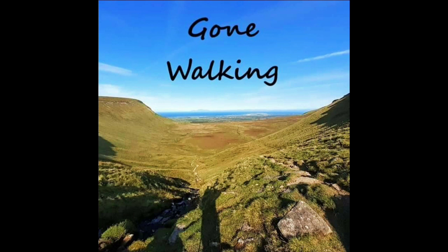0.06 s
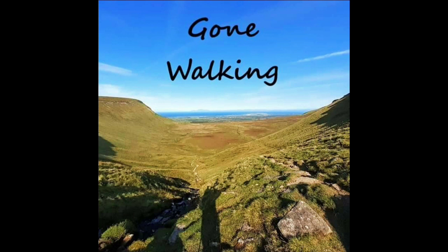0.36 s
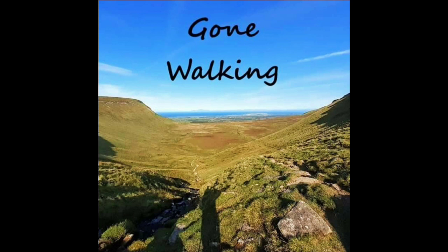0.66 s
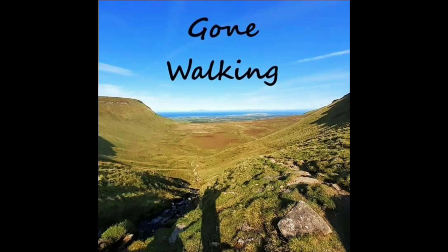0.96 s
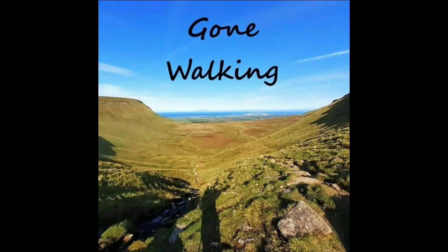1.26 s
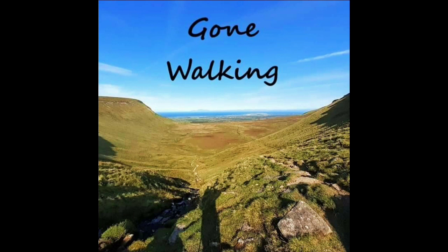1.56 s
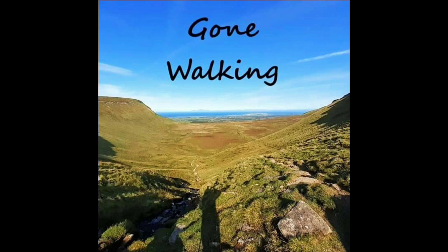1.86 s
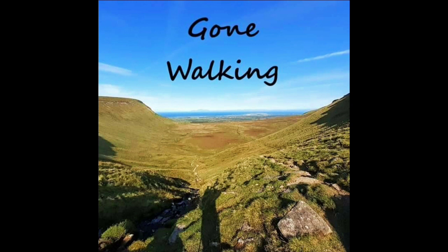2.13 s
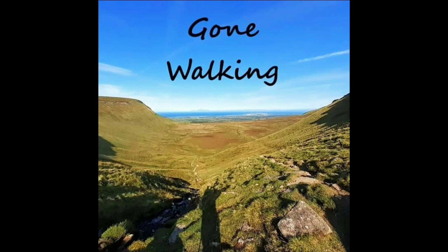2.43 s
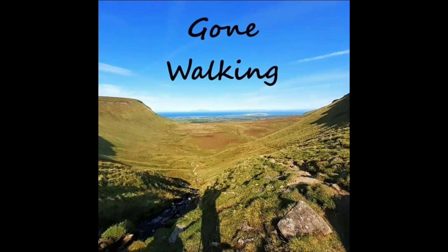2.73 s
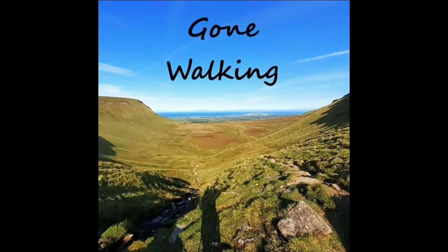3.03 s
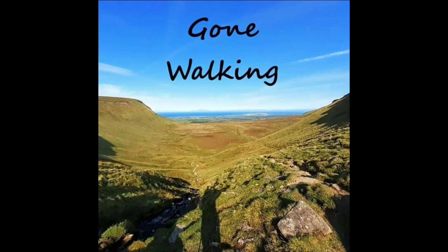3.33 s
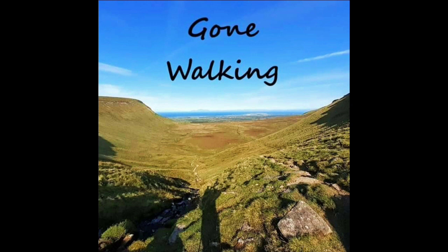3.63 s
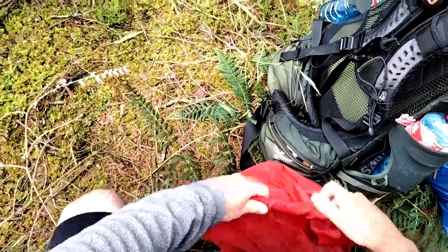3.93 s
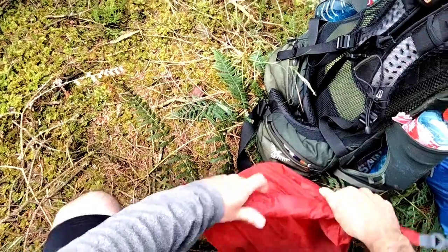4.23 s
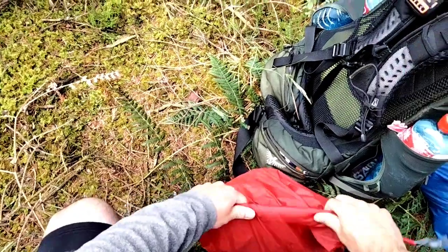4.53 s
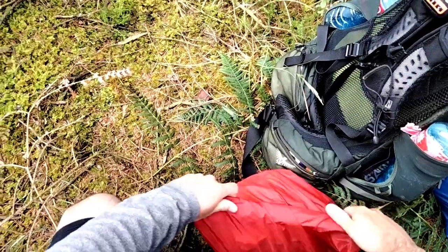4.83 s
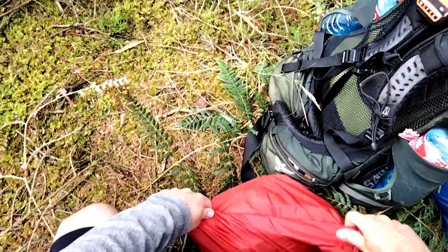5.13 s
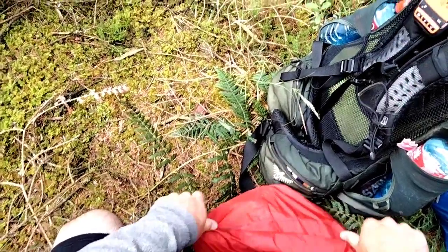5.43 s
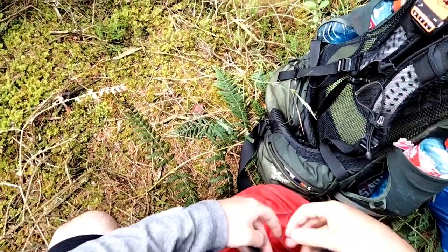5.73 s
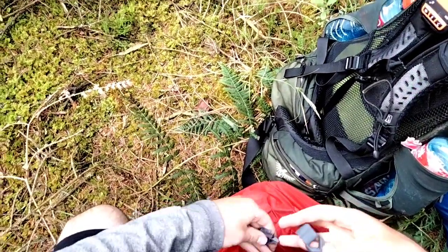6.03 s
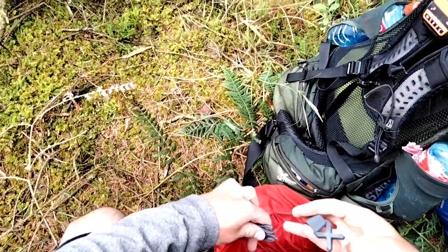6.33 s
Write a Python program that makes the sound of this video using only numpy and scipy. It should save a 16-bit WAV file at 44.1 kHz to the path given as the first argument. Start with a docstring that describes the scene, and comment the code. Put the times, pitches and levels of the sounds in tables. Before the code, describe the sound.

Hands squeeze and roll a thin nylon stuff sack close to a body-worn microphone, outdoors with no echo. The rustling starts at about 0.2 seconds: a bright sliding hiss mixed with crackling, in quick uneven strokes. It is strongest around 0.8 to 1.3 seconds, with sharp crease snaps and the dull shifting of the soft contents. A flap and more snaps come near 1.8 seconds, and the crumpling sounds slightly hollow from trapped air. From about 3 seconds the strokes are lighter, mostly short swishes with scattered clicks and soft flaps, and a faint zipping rub over the weave near 3.4 seconds. A sharp snap comes at 5.5 seconds and a pat of cloth at 5.8. The rustle then drops away, leaving a few faint buckle ticks until about 6.4 seconds. A faint low wind rumble lies underneath throughout.

```python
"""Rolling up a nylon sack

Two hands squeeze and roll a thin nylon stuff sack on the ground, then take up its buckle.
With each stroke the cloth hisses as it slides and crackles as it crumples. Creases snap,
panels flap, the ribbed weave zips and the soft load shifts. It is open air, with no echo.
A little wind touches a body-worn microphone, whose small opening rings in the high treble."""
import sys
import numpy as np
from scipy import signal
from scipy.fft import rfft, irfft, next_fast_len
from scipy.io import wavfile
from scipy.ndimage import uniform_filter1d

SR = 44100
rng = np.random.default_rng(int(sys.argv[2]) if len(sys.argv) > 2 else 0)


def master_out(mix):
    """Clip the mix to full scale and print it as 16-bit PCM to the path in sys.argv[1]."""
    frames = np.transpose(np.atleast_2d(mix))
    ceiling = np.clip(frames, -1, 1)
    pcm = np.round(ceiling * 32767).astype(np.int16)
    wavfile.write(sys.argv[1], SR, pcm)


N = 286021
T = np.arange(N) / SR

# strokes of the hands (start [s], length [s], sliding [dB], crumpling [dB], brightness [dB])
STROKES = [(0.219, 0.22, -67, -53.0, -3), (0.278, 0.081, -50.5, -50, -7), (0.407, 0.18, -48, -51, -8),
           (0.567, 0.13, -49, -54, -7), (0.696, 0.375, -51.5, -50.5, -12), (0.817, 0.22, -41.5, -46, -5),
           (1.072, 0.14, -48.5, -54, -8), (1.229, 0.094, -44.5, -50.5, -2), (1.362, 0.21, -52, -59.5, -7),
           (1.525, 0.075, -50.5, -53.5, -3), (1.621, 0.16, -49, -53.5, -3), (1.83, 0.052, -49, -53.5, -1),
           (1.921, 0.092, -59.5, -60, -5), (2.036, 0.091, -48, -53, -8.5), (2.107, 0.1, -51.5, -63.5, 0.5),
           (2.308, 0.063, -46.5, -54, 3), (2.423, 0.1, -46, -62, -7), (2.64, 0.104, -54, -62.5, -4),
           (2.749, 0.066, -44.5, -64.5, -2), (2.814, 0.086, -50, -53.5, -11),
           (2.92, 0.099, -44.5, -57.5, -9), (3.045, 0.144, -49.5, -68, -6), (3.14, 0.13, -49, -76, 0),
           (3.258, 0.12, -53.5, -60.5, -3), (3.403, 0.096, -46, -51.5, -2), (3.507, 0.066, -52.5, -66, -2),
           (3.649, 0.053, -48.5, -58, -5), (3.737, 0.044, -45.5, -49, -4), (3.836, 0.027, -46, -53, -5),
           (3.99, 0.14, -60.5, -69, -7), (4.07, 0.084, -50, -59, -3.5), (4.16, 0.072, -49, -55.5, -8),
           (4.259, 0.07, -52.5, -57, -11), (4.502, 0.075, -52.5, -59.5, -1), (4.642, 0.092, -54.5, -56, -5),
           (4.712, 0.1, -50.5, -64, -2), (4.83, 0.061, -48, -60.5, -1), (4.976, 0.12, -56, -71, -5),
           (5.085, 0.134, -49, -71, -1), (5.242, 0.23, -54.5, -62, -5), (5.519, 0.11, -53.5, -77, -8),
           (5.6, 0.073, -48, -54, -3.5), (5.698, 0.14, -53.5, -58.5, 0), (6.252, 0.064, -72.5, -76, 5)]
# the grip stirs the cloth between strokes, until the hands move to the buckle (time [s], sliding [dB])
GRIP = [(0.125, -106), (0.23, -61), (1, -65), (2.2, -64), (3.6, -65.5), (5.85, -63), (5.93, -73.5),
        (6.2, -94), (6.49, -111)]
# the hands take a new hold, nearly always with a brief hush (time [s], level change [dB])
NEW_HOLDS = [(1.203, -6), (1.36, -7), (1.635, -10), (2.645, -4.5), (2.838, -6), (3.376, -3), (3.64, 1.5),
             (4.96, -4), (5.445, -10), (5.925, -18)]
# tone of the sliding hiss (frequency [Hz], level [dB])
SLIDE_COLOUR = [(500, -36), (2500, -10), (5000, -9), (6400, -3.5), (8500, -1), (10000, 1), (15500, 4)]
# tone of the crumpling (frequency [Hz], level [dB])
CRUMPLE_COLOUR = [(100, -13), (300, -6.5), (700, -0.5), (1150, -7), (1400, -6.5), (1800, -2), (2700, -3.5),
                  (3700, -2.5), (5200, -7), (8000, -13), (15500, -20.5)]
# air left in the sack, which makes the crumpling sound hollow (time [s], share [0-1])
TRAPPED_AIR = [(0, 0.3), (1.2, 0.64), (2, 1), (2.8, 0.5), (3.3, 0), (6.4, 0)]
# crease snaps and buckle ticks (time [s], sharp edge [dB], panel [dB], panel pitch [Hz], length [ms])
SNAPS = [(0.199, -31.5, -47, 2000, 0.96), (0.223, -23, -35.5, 1700, 0.94), (0.249, -23, -43, 4600, 0.2),
         (0.3075, -21, -32, 2400, 1.0), (0.346, -18.5, -46, 5100, 0.34), (0.3524, -18, -34, 4500, 0.44),
         (0.527, -29, -32, 1800, 0.7), (0.647, -16.5, -32, 3980, 0.2), (0.6927, -17.5, -35, 1800, 0.3),
         (0.752, -36, -31, 1900, 0.9), (0.872, -24, -24, 3400, 0.38), (0.9614, -7, -32, 3500, 0.1),
         (0.977, -19, -27, 2200, 0.3), (1.017, -16, -39, 1800, 1), (1.035, -13, -25, 4900, 0.41),
         (1.093, -24, -33, 3600, 0.2), (1.137, -22, -39, 4030, 0.36), (1.189, -23, -35, 3500, 0.57),
         (1.483, -25, -29, 3130, 0.58), (1.798, -16, -25.5, 4200, 2.3), (1.802, -14, -37, 4600, 4.5),
         (1.8837, -28, -31, 5400, 1.7), (1.8884, -10.5, -31, 3600, 0.36), (1.8994, -32, -29, 1820, 0.37),
         (1.944, -24, -29, 2820, 0.7), (2.1023, -18, -37, 5100, 0.23), (2.271, -43, -35, 3460, 0.45),
         (2.3454, -19.5, -36, 3400, 2.1), (2.3923, -16.5, -37, 5200, 0.36), (2.4748, -21, -30, 4000, 1.9),
         (2.665, -38, -56, 2000, 0.7), (2.8848, -20, -45, 2200, 0.14), (2.9046, -24, -42, 5200, 0.5),
         (2.9186, -22, -35, 5000, 0.9), (3.098, -26, -34, 3320, 0.76), (3.318, -35, -31, 3550, 0.27),
         (3.332, -24, -30.5, 3730, 2.6), (3.465, -19, -42.5, 4800, 2.7), (3.536, -16, -43, 2300, 4.7),
         (3.562, -21, -30.5, 3150, 0.15), (3.689, -20.5, -37, 3180, 0.34), (4.132, -33, -36, 2320, 1.3),
         (4.5334, -31, -35.5, 3520, 0.7), (5.2307, -27, -35, 3600, 1.6), (5.3319, -29, -36, 2010, 0.3),
         (5.4699, -10.5, -35, 3560, 0.14), (5.7861, -36, -50, 1650, 0.9), (5.9056, -46.5, -46, 4000, 1.8),
         (5.9515, -33.5, -64, 2500, 5.9), (6.0455, -34.5, -46.5, 4100, 0.45), (6.3757, -47, -62, 2700, 0.4)]
# tone of a snap's sharp edge (frequency [Hz], level [dB])
EDGE_COLOUR = [(700, -61), (2500, -33), (5200, -9.5), (6800, -5), (9000, -1), (15500, -14.5)]
# slack panels pulled tight or patted, the lowest puffing out air (time [s], level [dB], pitch [Hz])
FLAPS = [(1.062, -26.5, 494), (1.19, -34.5, 720), (1.605, -32, 91), (1.793, -39, 74.4), (1.797, -24.5, 348),
         (2.065, -25, 546), (3.317, -35, 710), (3.507, -33.5, 416), (4.668, -26, 27.2), (4.781, -34, 520),
         (5.057, -38.5, 302), (5.228, -31, 735), (5.342, -36.5, 570), (5.644, -34.5, 740),
         (5.785, -33.5, 79), (5.7855, -21, 306)]
# shoves that move the soft load inside the sack (start [s], length [s], level [dB])
SHOVES = [(0.208, 0.23, -44.5), (0.5, 0.058, -44), (0.759, 0.26, -39.5), (1.184, 0.063, -44.5),
          (1.523, 0.22, -55), (1.87, 0.06, -44), (2.026, 0.049, -42.5), (2.304, 0.22, -51),
          (2.802, 0.079, -49.5), (3.028, 0.042, -47), (3.95, 0.063, -51), (4.31, 0.51, -54),
          (5.172, 0.036, -48), (5.63, 0.045, -53)]
# dull tone of the load (frequency [Hz], level [dB])
LOAD_COLOUR = [(40, -12), (120, -9), (220, -4), (340, .5), (580, -1.5), (780, -5), (1050, -11),
               (1600, -15.5), (5000, -15)]
# a finger or strap runs over the weave, one list a stroke (time [s], rib rate [Hz], level [dB])
ZIPS = [
    [(3.335, 1700, -84), (3.354, 942, -68), (3.367, 630, -56), (3.381, 507, -60.5), (3.402, 291, -74),
     (3.42, 392, -70), (3.445, 820, -75)],
    [(5.79, 2440, -63), (5.808, 2950, -66), (5.83, 2950, -69), (5.87, 3030, -78)],
    [(5.925, 8100, -99), (5.975, 6200, -77), (6.01, 6200, -86), (6.07, 6750, -81), (6.14, 6800, -98),
     (6.17, 6900, -97)],
]
# wind and handling rumble on the microphone (time [s], level [dB])
WIND_LEVEL = [(0.13, -94), (0.22, -73), (0.92, -65.5), (1.15, -67), (1.62, -67), (2.05, -68), (2.45, -66),
              (3.2, -69), (3.7, -71), (4.1, -68.5), (4.35, -65), (4.75, -64), (5.3, -73), (5.85, -62),
              (6.05, -73.5), (6.48, -78)]
# deep tone of that rumble (frequency [Hz], level [dB])
WIND_COLOUR = [(10, 10.5), (28, 1), (60, -2.5), (110, -7.5), (250, -6.5), (1500, -25)]
# where the microphone's opening, its port, rings (frequency [Hz], width [Hz], level [dB])
PORT_RINGS = [(8745, 810, 12), (15100, 2700, -8)]

TOP_HZ = 15650  # upper edge of the treble


def hands(sag_db=4.0, grip_crumple_db=4.5, new_hold_s=0.014):
    """Strokes add to the grip and slide less as the cloth tightens; gives three curves in dB."""
    sliding = treble = undb(curves(GRIP)[0]) ** 2
    crumpling = sliding * undb(grip_crumple_db) ** 2
    for start_s, length_s, slide_db, crumple_db, bright_db in STROKES:
        power = push(start_s, length_s)
        progress = np.clip((T - start_s) / length_s, 0, 1)
        stroke = power * undb(slide_db - sag_db * (progress - .5)) ** 2
        sliding = sliding + stroke
        treble = treble + stroke * undb(bright_db) ** 2
        crumpling = crumpling + power * undb(crumple_db) ** 2
    hold_db = sum(db * np.exp(-((T - s) / new_hold_s) ** 2) for s, db in NEW_HOLDS)
    hold = undb(hold_db) ** 2
    return 10 * np.log10([sliding * hold, crumpling * hold, treble / sliding])


def push(start_s, length_s, rise_s=0.054, fade_s=0.037):
    """The power of one push: the hand gathers speed, holds, then lets the cloth settle."""
    rise = np.clip((T - start_s) / rise_s, 0, 1)
    fade = np.exp(-np.clip(T - start_s - length_s, 0, 1) / fade_s)
    return (rise * fade) ** 2


def slide(level_db, bright_db, weave_hz=9500, weave_db=-19):
    """Threads flick over threads, so densely that they hiss; brightness sets the very top."""
    flicks = grains(rate=18000, spread_db=0.5) * catches(slow_db=1.72, fast_db=0.36)
    # the regular weave adds a faint, ragged note that wanders, as the cloth's speed is uneven
    wander = np.exp(0.23 * drift(4.8) + 0.047 * drift(1500))
    hz = np.minimum(weave_hz * wander, TOP_HZ)
    note = unit(np.sin(2 * np.pi * np.cumsum(hz) / SR))
    hiss = colour(flicks, SLIDE_COLOUR) + undb(weave_db) * note
    top = colour(hiss, [(9500, -37), (10300, -14), (11500, -1.5)])
    return (hiss - top + top * undb(bright_db)) * undb(level_db)


def crumple(level_db, lone_db=-7, hollow_db=-5):
    """Small wrinkles give way in bunches, more often under a hard squeeze; larger ones tick alone."""
    rate = 3000 * undb(0.32 * (level_db - np.median(level_db)))
    lone_ticks = undb(lone_db) * grains(rate=55, spread_db=2.5)
    bunches = grains(rate, spread_db=-0.5) * catches(slow_db=1.64, fast_db=1.0)
    crackle = colour(unit(bunches + lone_ticks), CRUMPLE_COLOUR) * undb(level_db)
    hollow = undb(hollow_db) * ring(crackle, hz=1900, width_hz=800)
    return crackle + curves(TRAPPED_AIR)[0] * hollow


def snaps(panel_width_hz=3000, tone_db=-1, click_ms=0.21, scatter_db=-16, scatter_ms=5.4):
    """A crease flips with one click, or a run of small slips if longer. Nearby folds scatter it."""
    out, ms = np.zeros(N), 1000 * T[:1024]
    lead = 32  # samples of room before the click
    for s, edge_db, panel_db, hz, length_ms in SNAPS:
        slips = unit_energy(rng.standard_normal(len(ms)) * np.exp(-ms / length_ms))
        scatter = unit_energy(rng.standard_normal(len(ms)) * np.exp(-ms / scatter_ms))
        click_share = np.exp(-length_ms / click_ms)
        flip = np.sqrt(click_share) * (ms == 0) + np.sqrt(1 - click_share) * slips
        burst = np.pad(flip + undb(scatter_db) * scatter, (lead, 0))
        edge = colour(burst, EDGE_COLOUR)
        # the panel beside the crease gives a broad crack and a short tone of its own
        crack = ring(ring(burst, hz, panel_width_hz), hz, panel_width_hz)
        panel = crack + undb(tone_db) * ring(burst, hz, width_hz=500)
        for part, db in ((edge, edge_db), (panel, panel_db)):
            # each level allows for what the port will add
            add(out, s - lead / SR, undb(db) * part / np.linalg.norm(port(part)))
    return out


def small_snaps(crumple_db, usual_db=-71, follow=1.25):
    """Lesser creases flip at random: loud under a hard squeeze, very faint in a light hold."""
    clicks = unit(colour(grains(rate=70, spread_db=2.0), EDGE_COLOUR))
    return clicks * undb(usual_db + follow * (crumple_db - np.median(crumple_db)))


def folds(x, swell_db=2.0, count=40):
    """The folds keep changing shape, so each narrow range of pitch swells and sinks on its own."""
    out, size = np.zeros(N), next_fast_len(N)
    spectrum = rfft(x, size)
    band_number = np.sqrt(np.linspace(0, 1, len(spectrum))) * (count - 1)
    for k in range(count):
        weight = np.maximum(1 - abs(band_number - k), 0)
        band = irfft(spectrum * weight, size)[:N]
        out += band * undb(swell_db * drift(30))
    return out


def flaps(swing_cycles=0.82, flutter_cycles=3.8, flutter_db=-13, crack_db=-7, crack_s=0.0016):
    """A panel jerks tight: one quick swing of air, then a flutter; small panels add a papery crack."""
    out, t = np.zeros(N), T[:8192]
    for s, db, hz in FLAPS:
        noise = rng.standard_normal(len(t))
        swing = np.sin(2 * np.pi * hz * t) * np.exp(-t * hz / swing_cycles)
        flutter = unit(ring(ring(noise, hz, hz), hz, hz)) * np.exp(-t * hz / flutter_cycles)
        smallness = min(hz / 250, 1) ** 2
        crack = smallness * unit(ring(noise, hz=1700, width_hz=590)) * np.exp(-t / crack_s)
        flap = swing + undb(flutter_db) * flutter + undb(crack_db) * crack
        add(out, s, undb(db) * unit_energy(flap))
    return out


def soft_load(crumple_db, usual_db=-57, follow=0.28):
    """Broad folds patter dully over the filling: a little with every squeeze, more with a shove."""
    stirred = undb(usual_db + follow * (crumple_db - np.median(crumple_db))) ** 2
    shoved = sum(push(start_s, length_s) * undb(db) ** 2 for start_s, length_s, db in SHOVES)
    patter = grains(rate=1800, spread_db=1.5) * catches(slow_db=2.07, fast_db=3.5)
    return colour(patter, LOAD_COLOUR) * np.sqrt(stirred + shoved)


def zips(jitter=0.041, flutter_db=-1.0, second_db=-15, third_db=-19):
    """Evenly spaced ribs sing at a pitch that follows the speed of the stroke."""
    out = np.zeros(N)
    for stroke in ZIPS:
        hz, db = curves(stroke)
        phase = 2 * np.pi * np.cumsum(hz * (1 + jitter * drift(900))) / SR
        touching = (T > stroke[0][0]) & (T < stroke[-1][0])
        contact = uniform_filter1d(touching.astype(float), size=300)  # soften both ends
        tone = np.sin(phase) + undb(second_db) * np.sin(2 * phase) + undb(third_db) * np.sin(3 * phase)
        out += unit(tone * undb(flutter_db * drift(300))) * undb(db) * contact
    return out


def wind():
    """Light air and the moving body rumble on the microphone."""
    rumble = unit(colour(rng.standard_normal(N), WIND_COLOUR))
    return rumble * undb(curves(WIND_LEVEL)[0])


def port(x):
    """The small opening in front of the microphone rings with every click."""
    return x + sum(undb(db) * ring(x, hz, width_hz) for hz, width_hz, db in PORT_RINGS)


def grains(rate, spread_db):
    """Tiny clicks of uneven strength at random moments, about rate of them a second."""
    strength = undb(spread_db * np.clip(rng.standard_normal(N), -2, 2.5))
    happens = rng.random(N) < rate / SR
    return unit(happens * strength * rng.choice([-1, 1], N))


def catches(slow_db, fast_db):
    """Cloth moves in fits: uneven pushes, each made of millisecond slips."""
    return unit(undb(slow_db * drift(68) + fast_db * drift(500)))


def drift(rate):
    """A smooth random curve that changes about rate times a second."""
    width = max(int(SR / rate), 2)
    return unit(uniform_filter1d(uniform_filter1d(rng.standard_normal(N), width), width))


def ring(x, hz, width_hz):
    """Keep the sound near one pitch, so that it rings there."""
    return signal.lfilter(*signal.iirpeak(hz, hz / width_hz, SR), x)


def colour(x, points):
    """Shape the tone by an outline of (frequency [Hz], level [dB]) points."""
    hz, db = np.transpose(points)
    size = next_fast_len(len(x))
    freqs = np.maximum(np.fft.rfftfreq(size, 1 / SR), 1)
    gain = undb(np.interp(np.log(freqs), np.log(hz), db))
    return irfft(rfft(x, size) * gain, size)[:len(x)]


def curves(rows):
    """Join a table's points into lines through time; the first column is the time."""
    times, *columns = np.transpose(rows)
    return [np.interp(T, times, column) for column in columns]


def add(out, s, x):
    """Mix a short sound in at s seconds."""
    i = int(np.clip(s * SR, 0, N - 1))
    out[i:i + len(x)] += x[:N - i]


def undb(db):
    """Turn decibels into a number to multiply by."""
    return 10 ** (np.asarray(db) / 20)


def unit(x):
    """Scale to an average power of 1."""
    return x / np.sqrt(np.mean(x ** 2))


def unit_energy(x):
    """Scale to a total energy of 1."""
    return x / np.linalg.norm(x)


def scene(level_db=-0.5):
    """The hands work the cloth close by, over a little wind; one channel."""
    slide_db, crumple_db, bright_db = hands()
    rustle = folds(slide(slide_db, bright_db) + crumple(crumple_db) + small_snaps(crumple_db))
    mix = rustle + soft_load(crumple_db) + snaps() + flaps() + zips() + wind()
    return mix[None] * undb(level_db)


def record(dry, start_s=0.125, fade_s=0.03):
    """The port colours everything; the sound fades in from silence and the highest treble is cut."""
    fade_in = np.clip((T - start_s) / fade_s, 0, 1)
    treble_cut = signal.ellip(10, .2, 70, TOP_HZ, fs=SR, output="sos")
    return signal.sosfilt(treble_cut, port(dry) * fade_in)


dry = scene()
out = record(dry)
master_out(out)
```